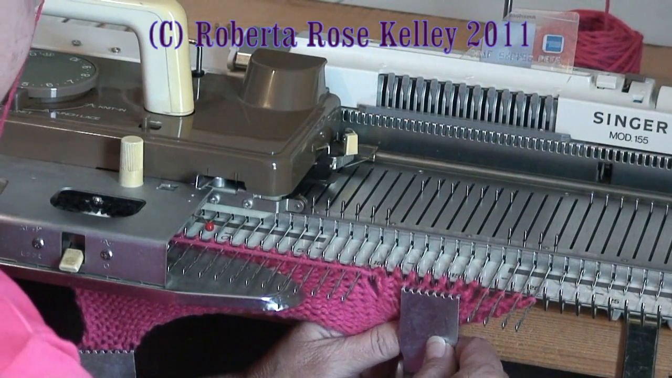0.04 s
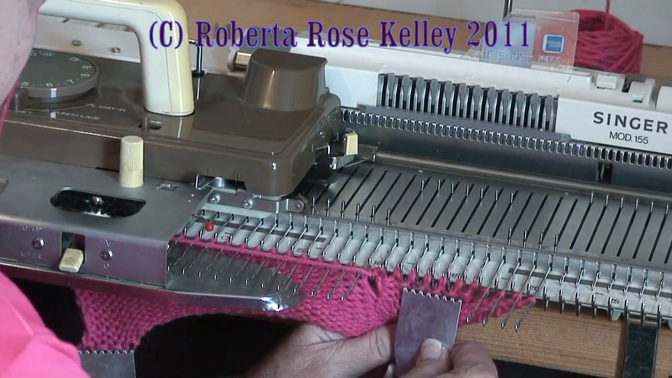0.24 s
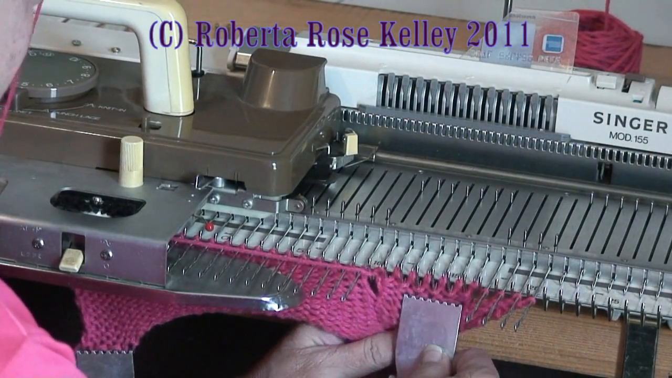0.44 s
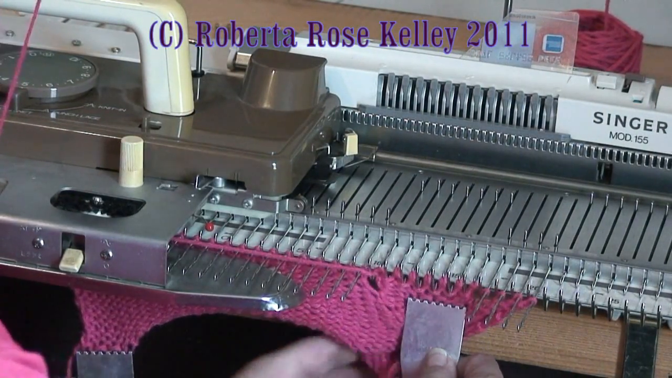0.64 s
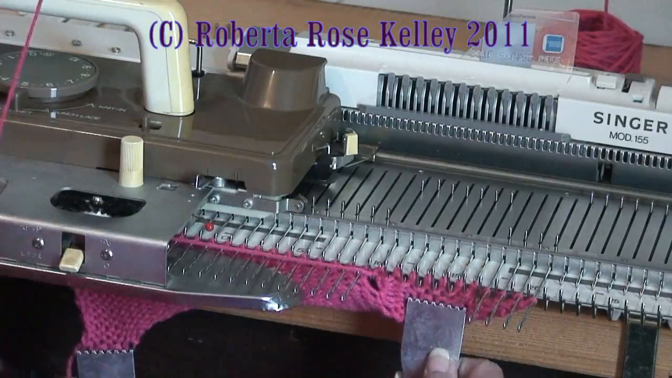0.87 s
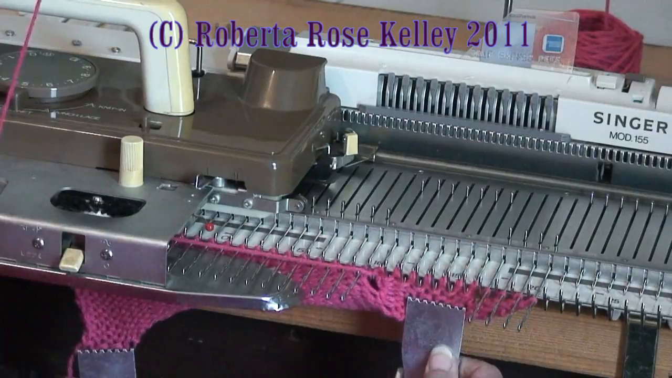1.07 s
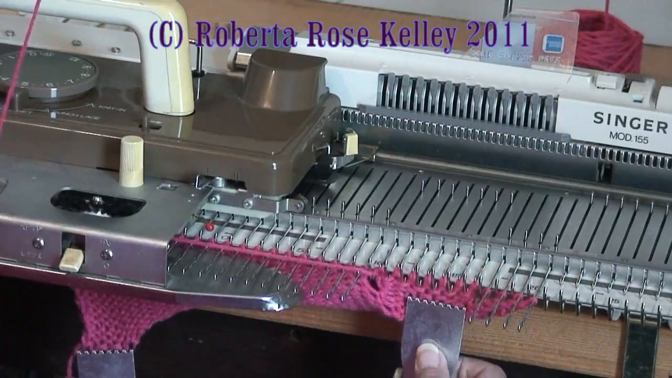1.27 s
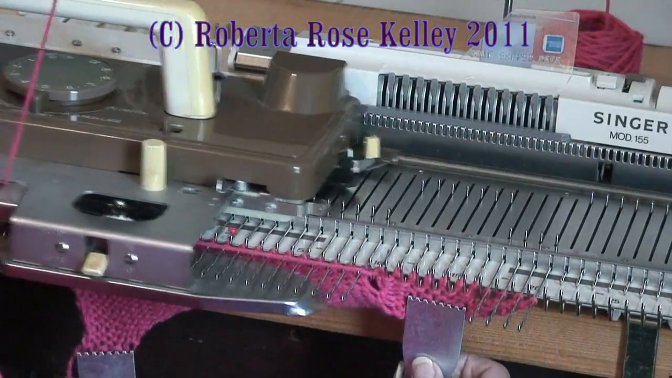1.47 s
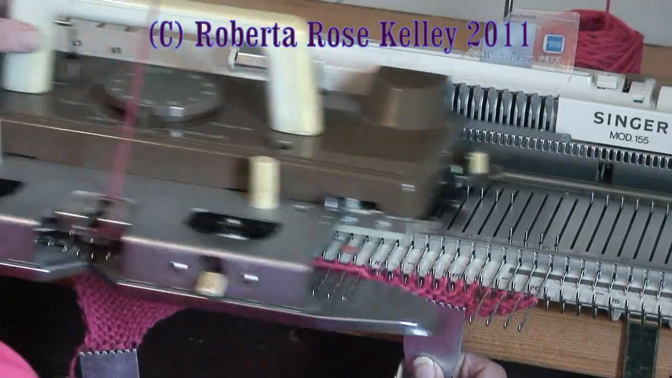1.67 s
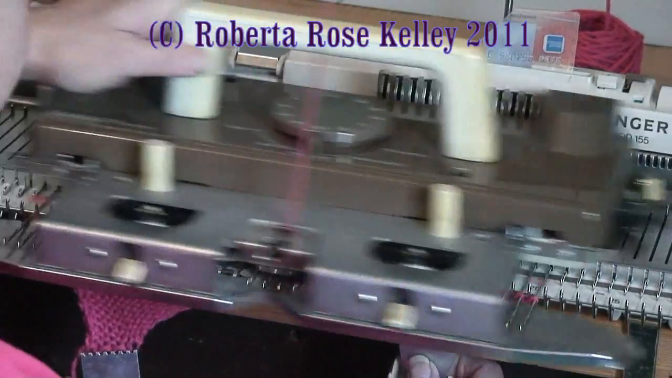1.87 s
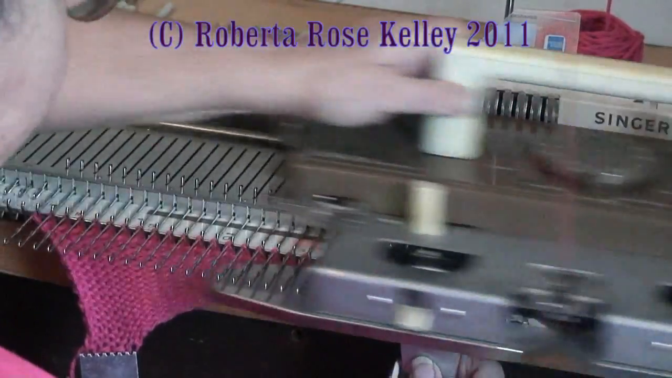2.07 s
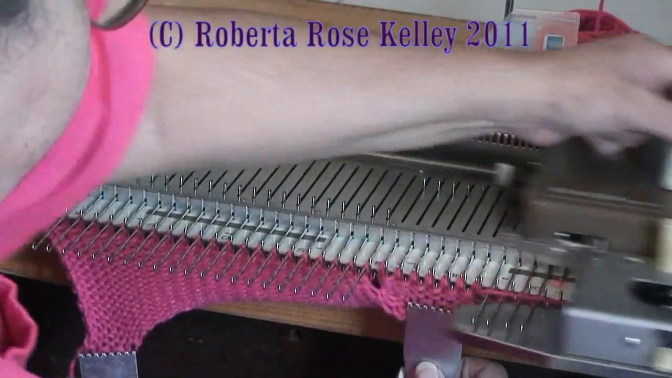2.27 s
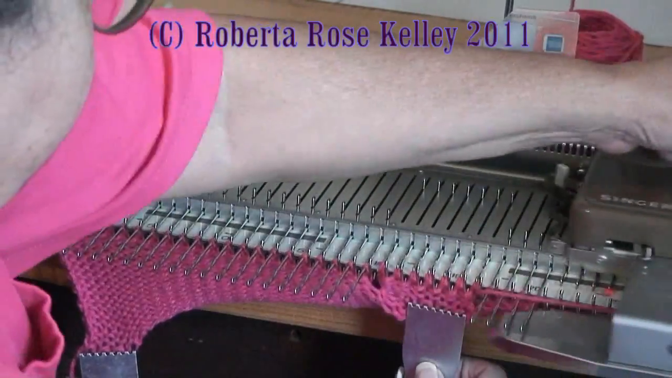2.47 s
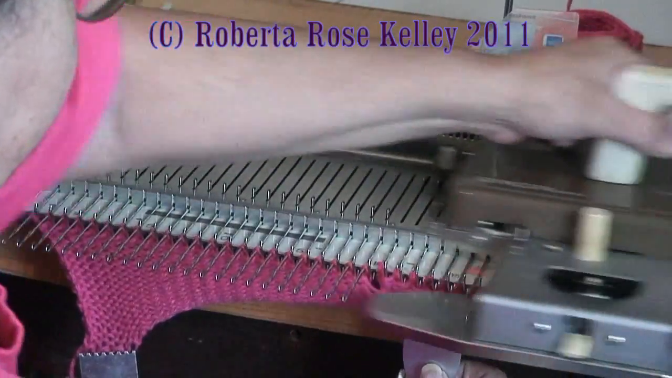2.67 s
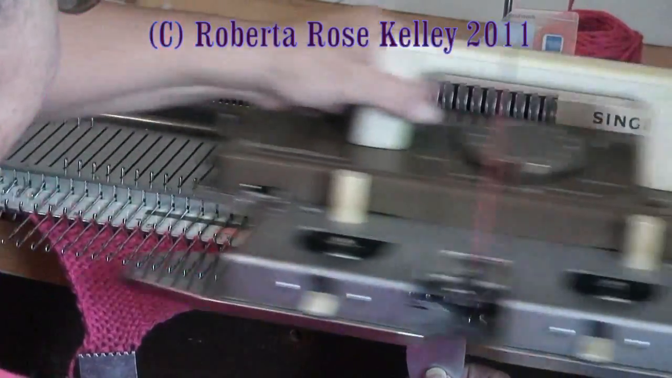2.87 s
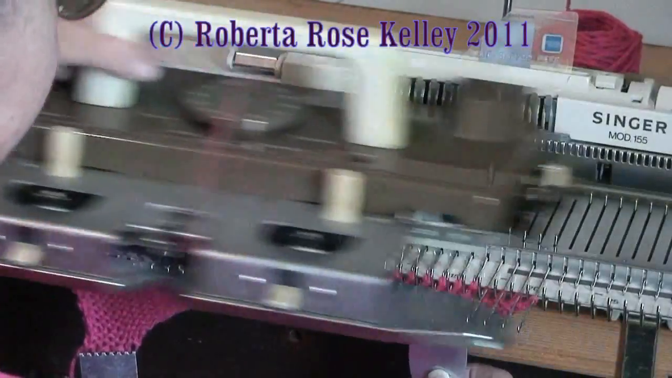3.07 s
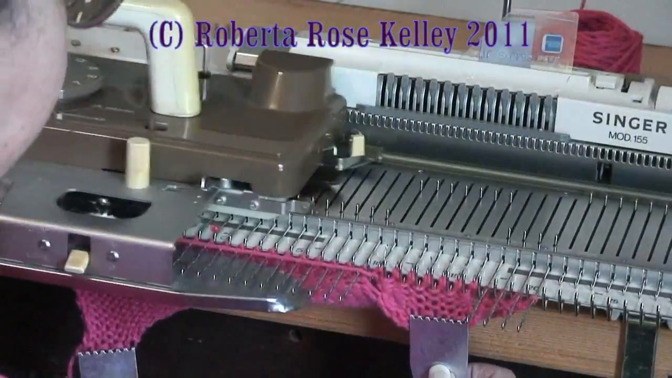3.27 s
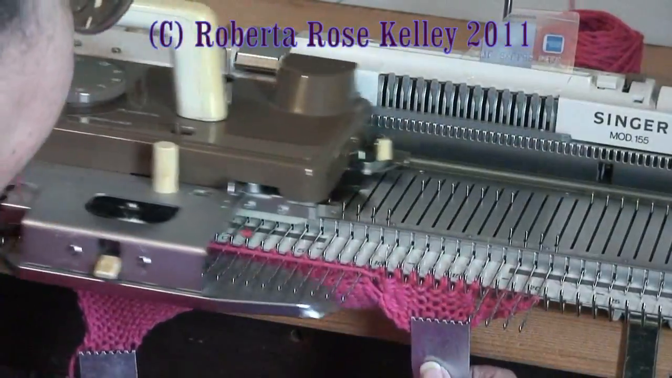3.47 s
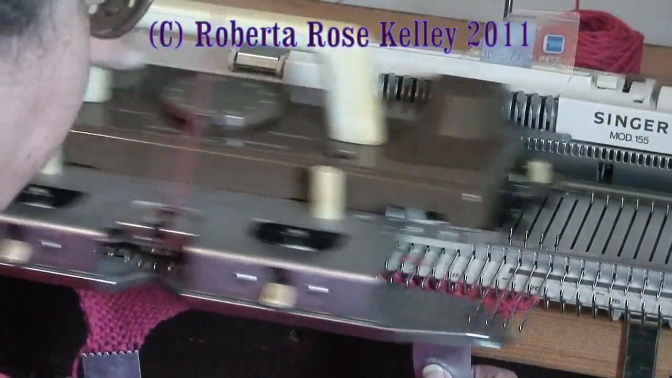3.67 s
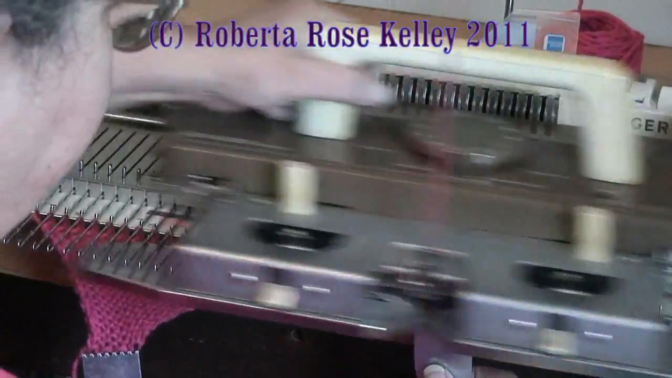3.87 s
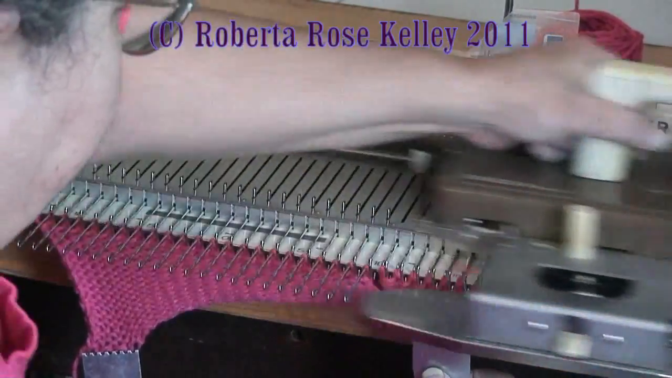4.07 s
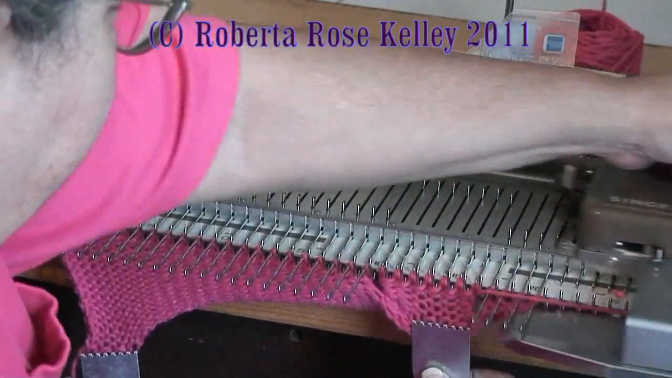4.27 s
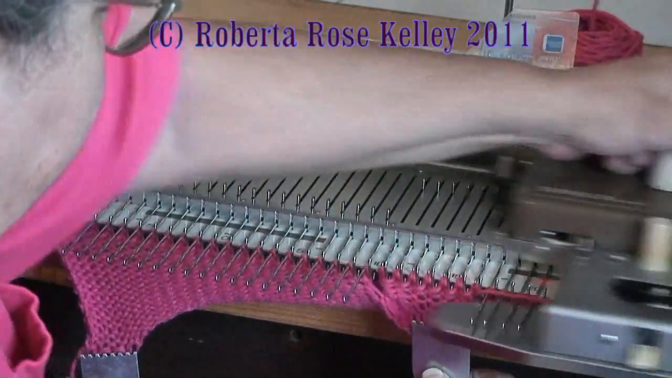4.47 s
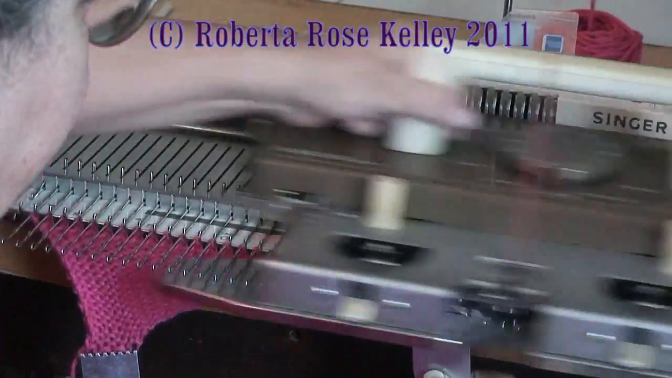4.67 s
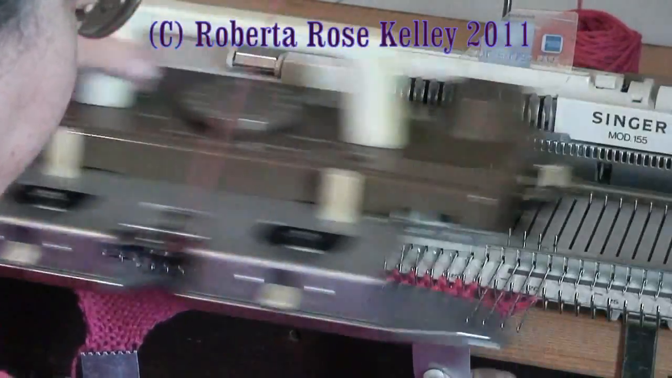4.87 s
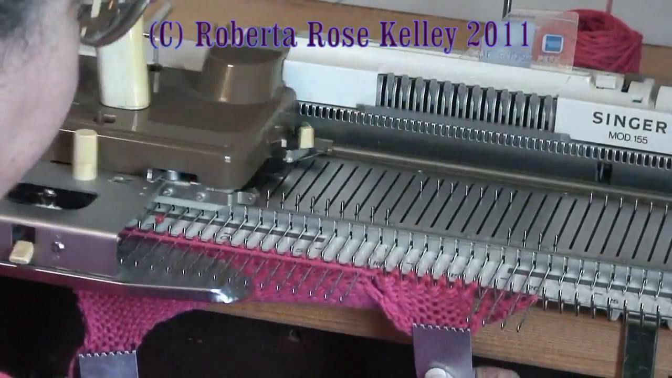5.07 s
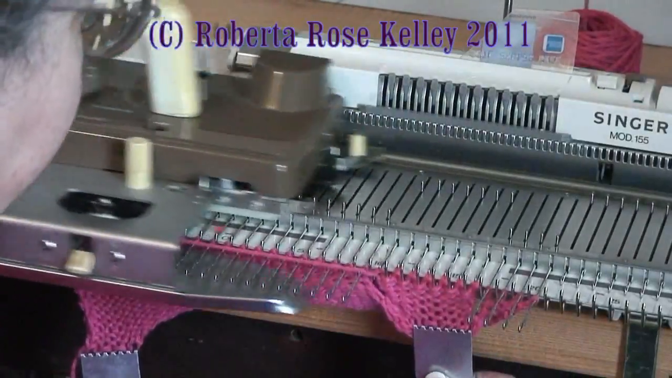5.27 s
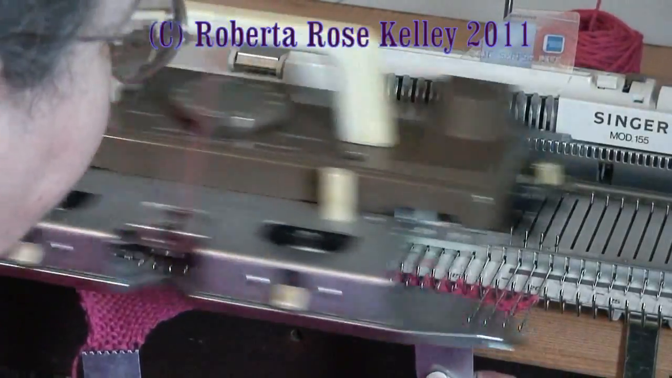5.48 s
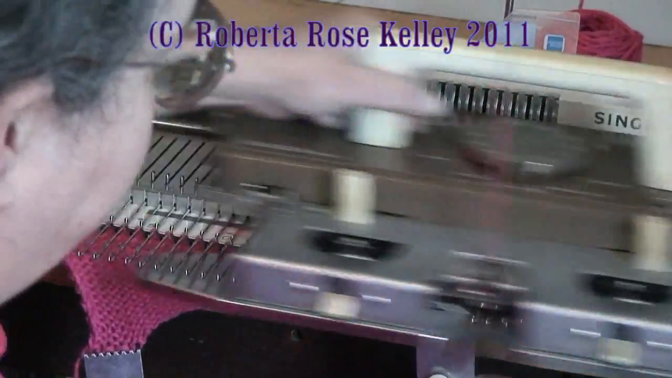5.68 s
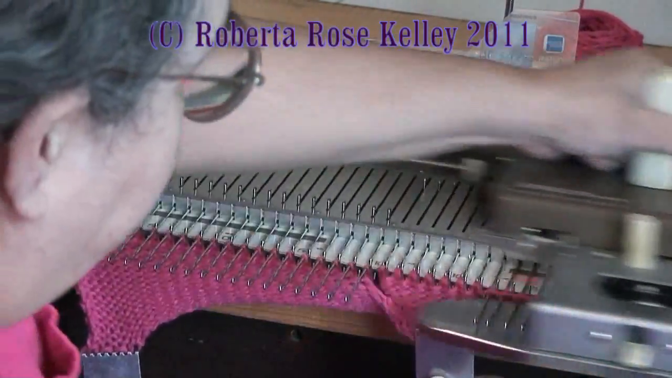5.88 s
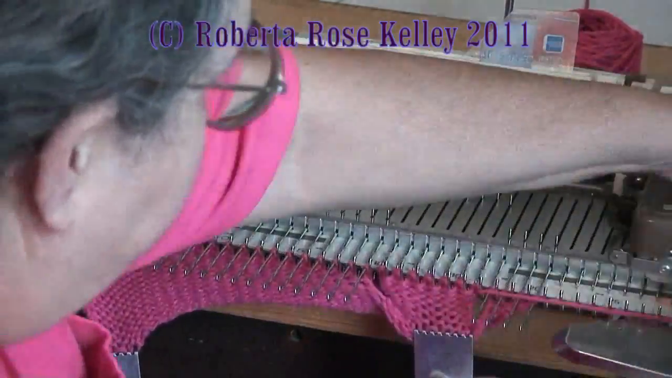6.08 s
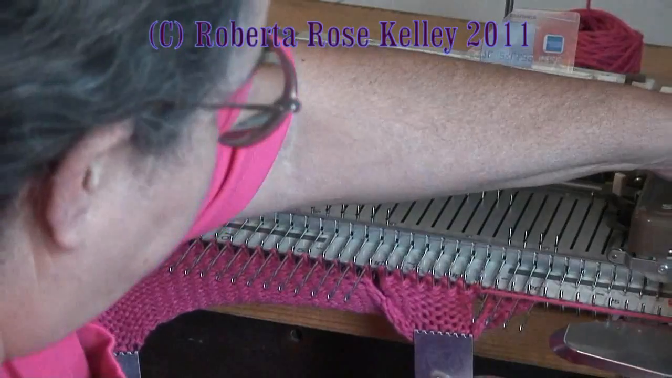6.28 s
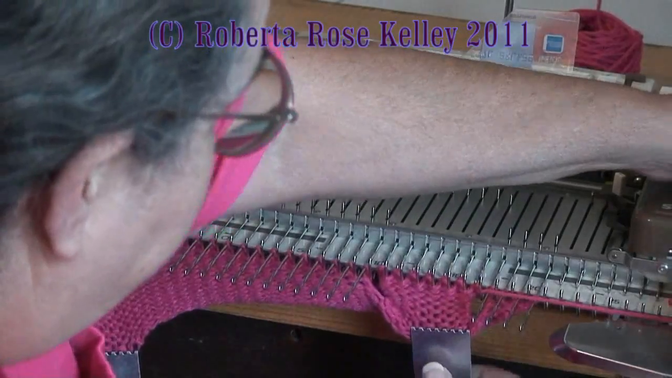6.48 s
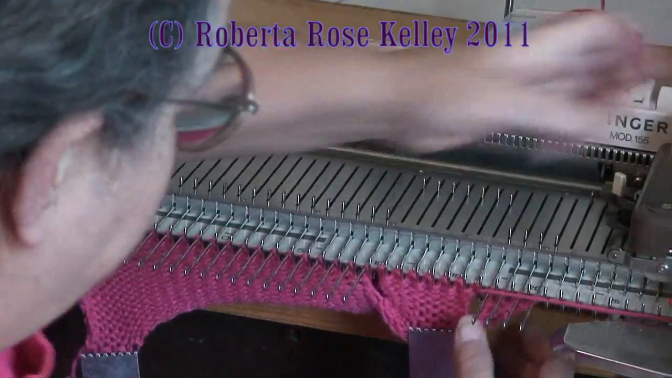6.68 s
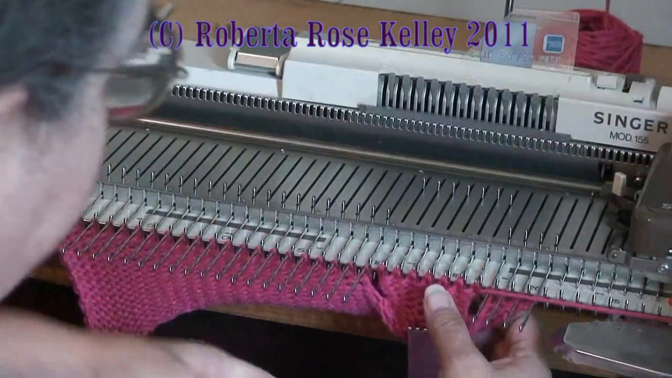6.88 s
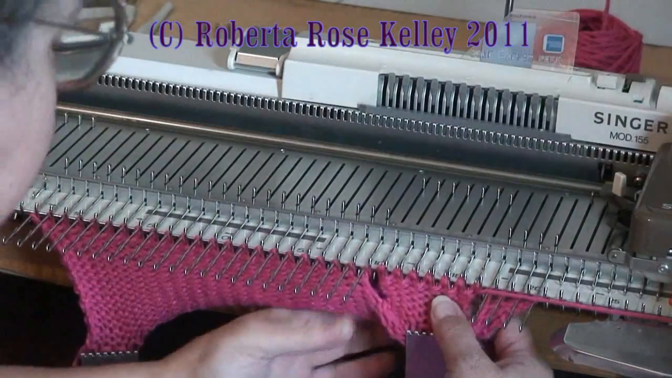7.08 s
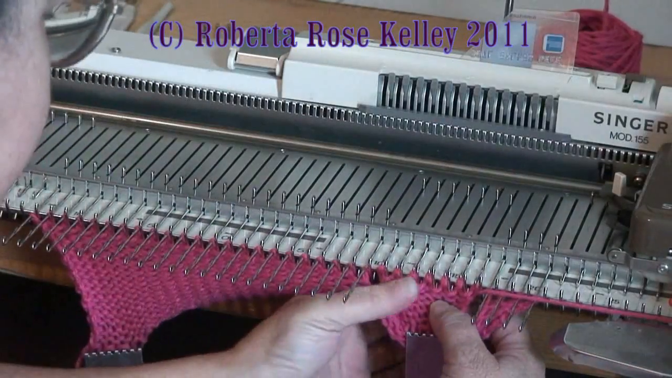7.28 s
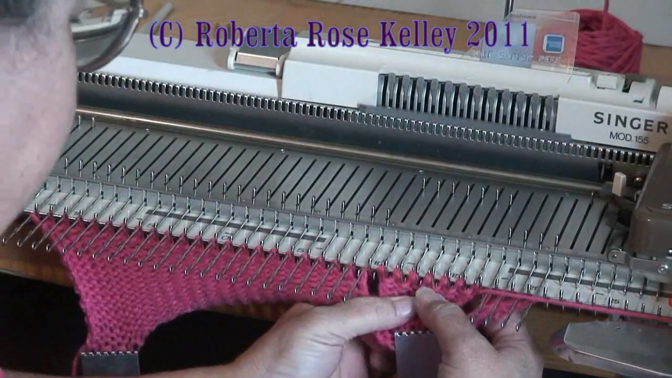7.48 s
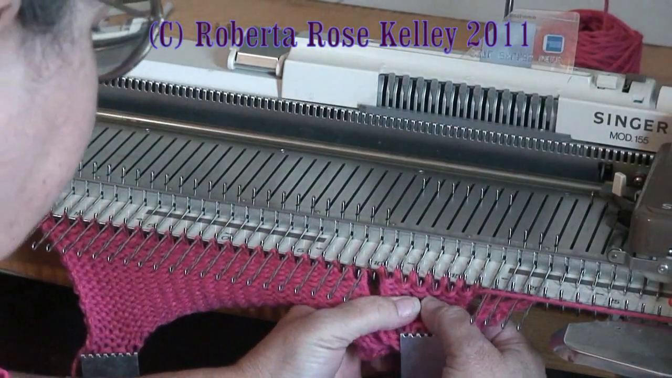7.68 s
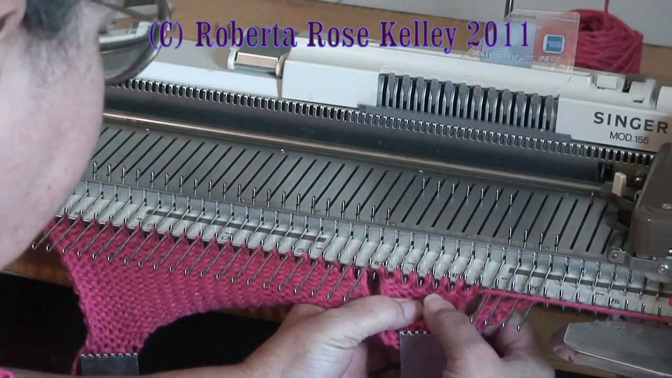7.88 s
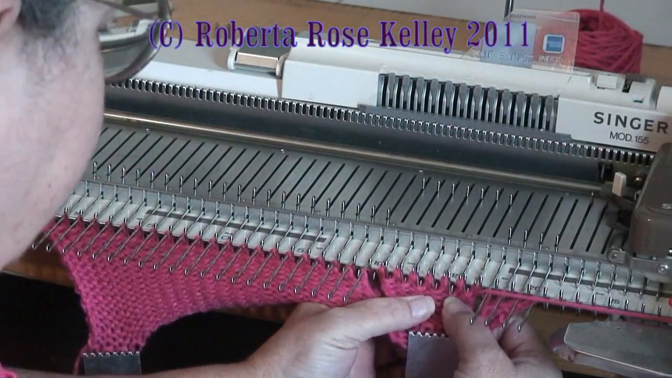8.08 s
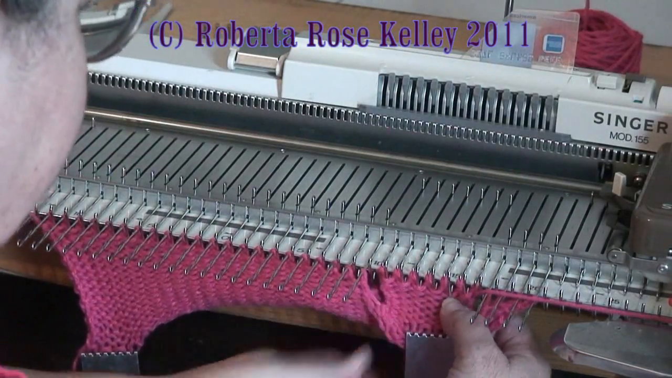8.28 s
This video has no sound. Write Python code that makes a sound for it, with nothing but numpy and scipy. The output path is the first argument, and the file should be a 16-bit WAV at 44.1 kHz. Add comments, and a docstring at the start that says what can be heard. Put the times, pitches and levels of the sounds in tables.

```python
"""A knitting machine carriage is pushed five times across its steel needle bed in a small room, heard close by.
Clatter: trains of clicks, clocked by needles passed, excite short steel bursts; rails scrape as filtered noise.
The sliding shell drums as noise through the modes of the bed; levers snap at the turns and a spring rings on.
Before and after, hands tug the knitting and its claw weight (decaying bursts, rustle, a squeak) over a faint
electric hum and room air. Soft saturation and a steep low-pass shape the sum."""
import sys
import numpy as np
from scipy import signal
from scipy.fft import rfft, irfft
from scipy.io import wavfile
from scipy.ndimage import uniform_filter1d

SR = 44100
rng = np.random.default_rng(int(sys.argv[2]) if len(sys.argv) > 2 else 0)


def inscribe(sig):
    """Save sig as 16-bit PCM at rate SR to the path in sys.argv[1].

    A 1-D sig is mono; a 2-D sig holds one channel per row.
    Samples are clipped to [-1, 1] before scaling.
    """
    pcm = np.round(np.clip(np.atleast_2d(sig).T, -1, 1) * 32767)
    wavfile.write(sys.argv[1], SR, pcm.astype(np.int16))


N = 367794
T = np.arange(N) / SR
TOP_HZ = 15800  # upper band limit

# room air spectrum, relative: [f/Hz, level/dB]
AIR_COLOUR = [(20, -10), (42, -11), (70, -15), (130, -17.5), (242, -13), (400, -14.5), (540, -15),
              (800, -18.5), (1300, -23), (2500, -28.5), (7100, -36.5), (11000, -42), (15000, -39)]
# stereo width of the room air: [f/Hz, side minus mid/dB]
AIR_WIDTH = [(60, -8.5), (110, -4), (200, -5), (380, -1.5), (700, -3), (1290, 4), (2380, 0), (4400, -0.5),
             (8120, -1), (15000, -2.5)]
# steady hum and high whine: [f/Hz, rms level/dB]
HUM = [(102.3, -55), (204.6, -66.5), (5626, -79), (15612, -71), (15676, -71), (15735, -66)]
# stereo width of the other sources: [f/Hz, side minus mid/dB]
WIDTH = [(60, -6), (250, -11), (500, -10), (1000, -8), (2000, -8), (4000, -7), (8000, -2.5), (12000, -5)]
# sleeve and knitting rustling under the hands: [t/s, length/s, level/dB]
RUSTLES = [(.17, 0.19, -61), (0.65, 0.25, -60), (1.15, 1, -61), (6.3, .08, -58), (6.99, 0.19, -53.5),
           (7.42, .2, -52), (7.732, .2, -59), (8.2, 0.52, -61.5)]
# spectrum of the rustle, relative: [f/Hz, level/dB]
RUSTLE_COLOUR = [(200, -7.5), (600, 6), (1300, 3), (2500, -6), (5000, -8.5), (8000, -13), (15000, -15.5)]
# claw weight and needles knocking: [t/s, level/dB, ring/dB, treble/dB, time between rebounds/s]
KNOCKS = [(0.341, -33, -4.5, -0.5, .005), (0.4775, -19.5, -13, -2.5, .0055), (1.478, -49.5, 10, -3, 0.0084),
          (7.324, -40, -5, 0, 0.0048), (7.406, -30, -2.5, -3, 0.011), (7.48, -44, 2.5, -10, .012),
          (7.837, -50, -11, 0, .004)]
# spectrum of knocks and dull clacks, relative: [f/Hz, level/dB]
KNOCK_COLOUR = [(150, -54), (500, 1.5), (1000, -6.5), (1800, 4), (3000, -8.5), (4200, -6.5), (6000, -11.5),
                (8000, -20), (12000, -16.5), (15700, -32.5)]
# modes excited by the knocks: [f/Hz, width/Hz, level/dB]
KNOCK_MODES = [(519, 24, 3), (687, 56, 7), (782, 24, 6), (1300, 56, -2), (1570, 21, -2), (1980, 43, -8),
               (2300, 44, -9)]
# squeak of tugged yarn: [t/s, f/Hz, level/dB]
SQUEAK = [(7.31, 1350, -68), (7.325, 1450, -54), (7.36, 1500, -60), (7.38, 1560, -72)]
# levers and latches snapping: [t/s, level/dB, dull clack re snap/dB]
SNAPS = [(0.626, -31, -5), (1.4765, -23.5, -23), (1.556, -24, 2.5), (1.581, -22, 0.5), (2.2837, -13, -15),
         (2.639, -28.5, -24), (2.6931, -31.5, -14), (2.7373, -8.5, -2.5), (3.469, -10.5, -20),
         (3.522, -25.5, 2), (3.5435, -19, -5), (3.587, -29, 5), (4.553, -29, -27), (4.615, -13, 0.5),
         (6.563, -41, 7), (7.226, -39, -12)]
# spectrum of the snaps, relative: [f/Hz, level/dB]
SNAP_COLOUR = [(200, -26.5), (700, -5), (1500, -22), (2500, -7), (3800, -1.5), (5200, -4.5), (7500, -1.5),
               (9000, -6), (10500, -5.5), (13000, -4.5), (15700, -18)]
# catch ending each stroke to the right: [t/s, level/dB, dull clack re snap/dB, spring level/dB]
CATCHES = [(2.4346, -11.5, 2.5, -52), (4.3337, -9.5, 5, -55), (6.066, -12.5, 8.5, -53)]
# modes of bed and carriage shell: [f/Hz, width/Hz, level/dB]
BED = [(114.1, 22, -19.5), (184, 40, -19.5), (250, 33, -21.5), (354.4, 22.6, -8), (487.3, 23, -8),
       (544.7, 22, -2.5), (576.5, 22, -8), (644.5, 18, -2.5), (660.7, 19, 3), (721, 21, -7.5),
       (780.5, 18, -7), (917, 31, -15.5), (956, 22, -5.5), (1011, 24, -14), (1190, 6.1, -9),
       (1529, 23, -11), (1770, 41, -22)]
# short steel chirps, ticks under the hands before the strokes, then at the carriage's turns:
# [t/s, length/s, f/Hz, level/dB]
CHIRPS = [(0.632, .03, 4380, -55), (0.638, .04, 7700, -51), (0.705, .03, 4400, -61),
          (1.58, 0.054, 3130, -49), (2.396, 0.056, 6100, -30), (2.648, 0.046, 4530, -50),
          (2.704, 0.045, 6340, -49), (4.577, 0.054, 6400, -49)]
# strokes, alternately right and left: [start t/s, stop t/s, speeding up/s, braking/s,
# mid-stroke needle rate f/Hz, cams meet needles t/s, cams leave them t/s]
PASSES = [(1.477, 2.555, .57, .28, 265, 1.728, 2.305), (2.625, 3.495, .27, .28, 187, 2.85, 3.38),
          (3.515, 4.458, .37, .35, 248, 3.681, 4.187), (4.515, 5.335, .22, .34, 203, 4.64, 5.228),
          (5.255, 6.21, .44, .32, 200, 5.469, 5.955)]
# spectrum of needles in the cams, relative: [f/Hz, level/dB]
NEEDLE_COLOUR = [(60, -33), (150, -38.5), (500, -5), (900, 1), (1300, -3), (2400, -1.5), (2950, -6),
                 (4500, -3), (5800, 0), (7300, -4), (8700, -2), (10100, -7), (11300, -0.5), (13500, -8),
                 (15700, -6)]
# spectrum of the lighter rail scrape, relative: [f/Hz, level/dB]
RAIL_COLOUR = [(60, -34.5), (200, 0), (900, -21), (1500, 0.5), (2200, 0.5), (2900, 3.5), (3250, 3.5),
               (3800, 4), (6400, 4), (8100, 0), (9500, 2), (11800, 2.5), (15700, -7.5)]
# needles falling into step and purring: [t/s, length/s, level/dB]
PURRS = [(2.02, .16, -42), (3.045, .18, -42), (3.902, .1, -45), (4.715, .13, -36.5), (5.0, .1, -47.5),
         (5.103, .07, -39.5), (5.64, .1, -40)]
# shell bumping on the bed: [t/s, extra rumble/dB]
BUMPS = [(1.83, 8.5), (2.03, 3), (2.24, 2), (2.685, 2.5), (3.149, 6.5), (3.29, 2), (4.09, 4.5), (4.43, 1.5),
         (5.1, 4.5), (5.97, 3.5), (6.11, 4.5)]
# modes of the plucked spring: [f/Hz, level/dB, t60/s]
SPRING = [(4560, -5, 0.79), (7827, -5, 0.89), (7957, -6, 1.7), (11130, -19, 1.2)]

AIR_DB = -51.5  # mean level of the mid signal
REBOUND_DB = -2.5  # each rebound re the one before
KNOCK_T60_S = .014
SURGE_HZ_PER_S = 160  # the arm keeps gaining speed through a stroke
CAM_ATTACK_S, CAM_RELEASE_S = 0.09, 0.034  # the cams take up needles gradually, drop them fast
CAM_DB, RAIL_DB, SHELL_DB, PURR_DB = -20, -24.5, -27.5, -49  # at full pace; shell at mid-bed
CAM_POWER, RAIL_POWER = 2.48, 1.91  # amplitude grows as pace to this power
SHELL_POWER, SHELL_POWER_RIGHT = 2.12, 1.25  # likewise, at the left and right ends
SHELL_RIGHT_DB, SHELL_T60_S = 2, 0.31  # rise from left end to right end; ring-down
BUMP_S = 0.04
SLOW_NEEDLES_HZ = 59.3  # around and below this rate the power of the click train falls


def undb(db):
    """Level to amplitude ratio."""
    return 10 ** (np.asarray(db) / 20)


def unit(x):
    """Normalise to rms 1."""
    return x / np.sqrt(np.mean(x ** 2))


def curve(table, axis):
    """Linear interpolation of one table column over time."""
    rows = np.array(table)
    return np.interp(T, rows[:, 0], rows[:, axis])


def noise():
    """Two independent white noises."""
    return rng.standard_normal((2, N))


def walk(hz):
    """Interpolated random fluctuation, hz knots a second, with a spread near 1."""
    knots = rng.standard_normal(4096)
    return 1.2 * np.interp(T * hz, np.arange(len(knots)), knots)


def ramp(since, length):
    """Linear rise from 0 to 1 over a length of time."""
    return np.clip(since / length, 0, 1)


def swell(s, length):
    """Gaussian envelope about a moment; length spans its 1/e points."""
    return np.exp(-(2 * (T - s) / length) ** 2)


def convolve(x, response):
    """Linear system: both channels convolved with an impulse response."""
    return signal.fftconvolve(x, np.atleast_2d(response), axes=-1)[:, :N]


def colour(x, points, size=4096):
    """Minimum-phase filter: the folded cepstrum makes the given spectrum (Hz, dB) causal."""
    hz, db = np.transpose(points)
    grid = np.maximum(np.arange(size // 2 + 1) * SR / size, 1)
    level = np.interp(np.log(grid), np.log(np.maximum(hz, 1)), db)
    cepstrum = irfft(np.log(undb(level)))
    cepstrum[1:size // 2] *= 2
    cepstrum[size // 2 + 1:] = 0
    return convolve(x, irfft(np.exp(rfft(cepstrum))))


def ring(x, modes, size=8192):
    """Modal superposition: damped cosines (Hz, width, dB), alternate modes in opposite phase."""
    t = T[:size]
    response = np.zeros(size)
    for k, (hz, width, db) in enumerate(modes):
        gain = (-1) ** k * undb(db) * 2 * np.pi * width / SR
        response += gain * np.exp(-np.pi * width * t) * np.cos(2 * np.pi * hz * t)
    return convolve(x, response)


def resonate(x, hz, width):
    """Second-order resonance with gain 1 at its centre."""
    return signal.lfilter(*signal.iirpeak(hz, hz / width, fs=SR), x)


def spread(x, side_db=0, width=WIDTH):
    """Mid-side stereo: two signals become mid and side, then left and right."""
    side = undb(side_db) * colour(x[1:], width)[0]
    return np.array([x[0] + side, x[0] - side])


def contact(ring_t60, room_db, room_t60, size=16384):
    """Impact response: noise under two exponential decays, steel then room, with unit mean energy."""
    t = T[:size]
    near = unit(undb(-60 * t / ring_t60))
    far = unit(undb(-60 * t / room_t60))
    decay = np.hypot(near, undb(room_db) * far)
    return unit(rng.standard_normal((2, size)) * decay) / np.sqrt(size)


def blows(times, db, ring_t60, room_db, room_t60):
    """Superposition of impacts: an independent contact burst at each time."""
    out = np.zeros((2, N + SR))
    for s, gain in zip(times, undb(db)):
        burst = contact(ring_t60, room_db, room_t60)
        first = int(s * SR)
        out[:, first:first + burst.shape[1]] += gain * burst
    return out[:, :N]


def background():
    """Stationary noise and tones: room air, motor hum, electric whine; a thin hiss joins near the end."""
    air = spread(unit(colour(noise(), AIR_COLOUR)), width=AIR_WIDTH) * undb(AIR_DB + .5 * walk(6.4))
    hum = sum(np.sqrt(2) * undb(db + .4 * walk(12)) * np.sin(2 * np.pi * hz * T) for hz, db in HUM)
    hiss = unit(ring(noise(), [(10560, 450, 0)])) * undb(-71) * ramp(T - 7.22, .05)
    return air + hum + hiss


def rustle():
    """Friction noise: wool and cloth rub in small uneven slips, an unsteady filtered noise."""
    rubbing = sum(undb(db) * swell(s, length) for s, length, db in RUSTLES)
    slips = noise() * undb(5.1 * walk(90))
    return spread(unit(colour(slips, RUSTLE_COLOUR))) * rubbing


def rebounds(count=3):
    """Inelastic rebound: each knock repeats, weaker each time (times, dB, ring dB, treble dB)."""
    rows = []
    for s, db, ring_db, treble_db, gap in KNOCKS:
        for k in range(count):
            rows.append((s + k * gap, db + k * REBOUND_DB, ring_db, treble_db))
    return np.transpose(rows)


def taps(times, db):
    """Impulsive force: one sample at each time, in the mid signal only."""
    out = np.zeros((2, N))
    np.add.at(out[0], (times * SR).astype(int), undb(db))
    return out


def squeak():
    """Harmonic tone of tugged yarn: a wavering fundamental and its third harmonic."""
    hz = curve(SQUEAK, axis=1) * (1 + .012 * walk(400))
    turn = 2 * np.pi * np.cumsum(hz) / SR
    sounding = (T > SQUEAK[0][0]) * (T < SQUEAK[-1][0])
    return (np.sin(turn) + undb(-8) * np.sin(3 * turn)) * undb(curve(SQUEAK, axis=2)) * sounding


def handling():
    """Impact and modal response: the claw weight knocks on the needles as the knitting is pulled down."""
    s, db, ring_db, treble_db = rebounds()
    tick = blows(s, db + 24.0, ring_t60=KNOCK_T60_S, room_db=-0.5, room_t60=0.16)
    tick = colour(tick, KNOCK_COLOUR)
    # split at 2 kHz to set the treble of each knock
    dull = signal.sosfilt(signal.butter(1, 2000, fs=SR, output="sos"), tick)
    tick = dull + (tick - dull) * undb(np.interp(T, s, treble_db))
    push = taps(s, db + ring_db + 28.5)
    push = push + blows(s, db + ring_db + 34.5, ring_t60=.02, room_db=17, room_t60=0.3)
    return spread(tick + ring(push, KNOCK_MODES)) + squeak()


def levers():
    """Impact of small steel levers snapping over; a dull clack, heavier for some, excites the shell modes."""
    s, db, clack_db = np.transpose(SNAPS + [row[:3] for row in CATCHES])
    snap = colour(blows(s, db + 15.5, ring_t60=0.066, room_db=10.0, room_t60=.18), SNAP_COLOUR)
    clack = blows(s, db + clack_db + 16, ring_t60=.025, room_db=6, room_t60=0.12)
    return spread(snap + colour(clack, KNOCK_COLOUR) + undb(2.5) * ring(clack, BED))


def chirps():
    """Resonance excited by noise: short, rough, narrow-band steel chirps under Gaussian envelopes."""
    out = np.zeros((2, N))
    for s, length, hz, db in CHIRPS:
        width = hz * 0.09
        tone = unit(resonate(resonate(noise(), hz, width), hz, width))
        out += tone * undb(db) * swell(s, length)
    return out


def motion():
    """Kinematics: pace 0-1, needles a second, place on the bed (left 0, right 1), load on the cams."""
    pace, speed, place, load = np.zeros((4, N))
    for k, (start, stop, rise, brake, hz, meet, leave) in enumerate(PASSES):
        push = np.sin(np.pi / 2 * ramp(T - start, rise)) * np.sin(np.pi / 2 * ramp(stop - T, brake))
        pace = np.hypot(pace, push)
        speed = speed + push * (hz + SURGE_HZ_PER_S * (T - (start + stop) / 2))
        place = place + (-1) ** k * np.cumsum(push) / np.sum(push)
        load = load + np.sqrt(ramp(T - meet, CAM_ATTACK_S) * ramp(leave - T, CAM_RELEASE_S))
    return pace, np.maximum(speed, 1), np.clip(place, 0, 1), load


def needle_clicks(travel, scatter_db, jitter, count):
    """Jittered pulse trains: each needle meets count cam faces or latches, a little early or late."""
    needle = np.arange(1200)
    out = np.zeros((2, N))
    for _ in range(count):
        late, strength, place = rng.standard_normal((len(needle), 3)).T
        at = np.searchsorted(travel, needle + rng.random() + jitter * late)
        inside = at < N
        gain = undb(scatter_db * strength)
        sign = np.sign(rng.standard_normal(len(needle)))
        np.add.at(out[0], at[inside], (gain * sign)[inside])
        np.add.at(out[1], at[inside], (gain * place)[inside])
    return out


def along_bed(clicks, travel, stretch, ring_t60, room_db, room_t60, count=6):
    """Position-dependent response: stretches of needles crossfade between count different bursts."""
    place = travel / stretch
    out = 0
    for k in range(count):
        share = np.clip(1 - np.abs((place - k) % count - 1), 0, 1)
        out = out + convolve(clicks * np.sqrt(share), contact(ring_t60, room_db, room_t60))
    return unit(out)


def shifting(x, travel, depth_db, count=14):
    """Band modulation: bands swell and sink alone as different needles and plates take the load."""
    hz = np.arange(N // 2 + 1) * SR / N
    place = np.sqrt(np.minimum(hz / TOP_HZ, 1)) * (count - 1)
    spectrum = rfft(x)
    out = 0
    for k in range(count):
        band = irfft(spectrum * np.clip(1 - np.abs(place - k), 0, 1), N)
        drift = np.interp(travel / 7, np.arange(256), rng.standard_normal(256))
        out = out + band * undb(depth_db * drift)
    return out


def drumming(pace, place):
    """Energy balance of the shell: drive follows the pace, stored energy decays, bumps add level."""
    power = SHELL_POWER + (SHELL_POWER_RIGHT - SHELL_POWER) * place
    drive = pace ** power * undb(SHELL_DB + SHELL_RIGHT_DB * (place - .5))
    keep = np.exp(-2 * np.log(1000) / (SHELL_T60_S * SR))
    energy = signal.lfilter([1 - keep], [1, -keep], drive ** 2 + 1e-18)
    return np.sqrt(energy) * undb(sum(db * swell(s, BUMP_S) for s, db in BUMPS))


def carriage():
    """Repeated impact, friction and forced vibration: needles clatter, rails scrape, the shell drums."""
    pace, speed, place, load = motion()
    travel = np.cumsum(speed) / SR  # in needles
    clicks = needle_clicks(travel, scatter_db=3, jitter=.15, count=10)
    clicks = unit(clicks * (pace > 0) / np.sqrt(speed + SLOW_NEEDLES_HZ))
    steel = along_bed(clicks, travel, stretch=8, ring_t60=0.012, room_db=1, room_t60=0.18)
    needles = unit(colour(steel + undb(-3.5) * noise(), NEEDLE_COLOUR))
    scrape = unit(colour(noise() * undb(2.9 * walk(170)) + undb(-1.5) * steel, RAIL_COLOUR))
    # the loud middle of a stroke is the cams working; at its ends only the rails are left
    cams = load * pace ** CAM_POWER
    rails = undb(RAIL_DB + 1.0 * walk(30)) * pace ** RAIL_POWER
    clatter = shifting(undb(CAM_DB) * cams * needles + rails * scrape, travel, depth_db=1.36)
    # as the carriage coasts to a stop the top of the hiss dies first
    slowing = uniform_filter1d(1. * (np.gradient(pace) < 0), size=1000)
    coasting = ramp(.6 - pace, 0.35) * slowing
    muted = colour(clatter, [(1500, -3), (4000, 0.5), (7000, -0.5), (12000, -9.5)])
    clatter = clatter + coasting * (muted - clatter)
    # the drive of each mode fluctuates on its own
    shell = 0
    for hz, width, db in BED:
        shell = shell + resonate(noise() + undb(-6.5) * clicks, hz, width) * undb(db + 0.33 * walk(14))
    # the drumming carries little bass below about 110 Hz
    shell = signal.sosfilt(signal.butter(2, 110, "highpass", fs=SR, output="sos"), shell)
    rumble = unit(shell) * drumming(pace, place) * undb(0.7 * walk(35))
    # the even spacing of the needles gives a low purr that follows the speed
    turn = 2 * np.pi * travel + 0.17 * walk(45)
    in_step = sum(undb(db) * swell(s, length) for s, length, db in PURRS)
    purr = np.sin(turn) + undb(-11.5) * np.sin(2 * turn)
    purr = purr * (in_step + undb(PURR_DB) * cams) * undb(2 * walk(30))
    return spread(clatter) + spread(rumble, side_db=0.5) + purr


def spring():
    """Free decay of plucked modes: a thin ring that outlasts each stroke to the right."""
    out, t = np.zeros(N), T[:SR]
    tone = sum(undb(db - 60 * t / t60) * np.sin(2 * np.pi * hz * t) for hz, db, t60 in SPRING)
    for s, _, _, db in CATCHES:
        out[int(s * SR):int(s * SR) + SR] += undb(db) * tone
    return out


def scene():
    """Linear superposition of all sources."""
    return background() + rustle() + handling() + levers() + chirps() + carriage() + spring()


def record(dry):
    """Soft saturation rounds the loudest peaks; an elliptic low-pass then limits the band."""
    rounded = np.tanh(dry)
    return signal.sosfilt(signal.ellip(12, .1, 80, TOP_HZ, fs=SR, output="sos"), rounded)


dry = scene()
out = record(dry)
inscribe(out)
```